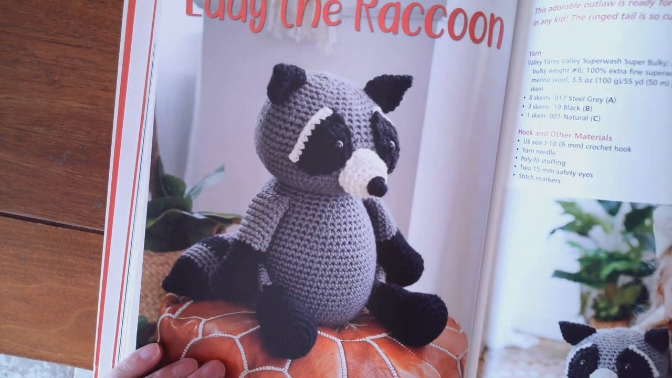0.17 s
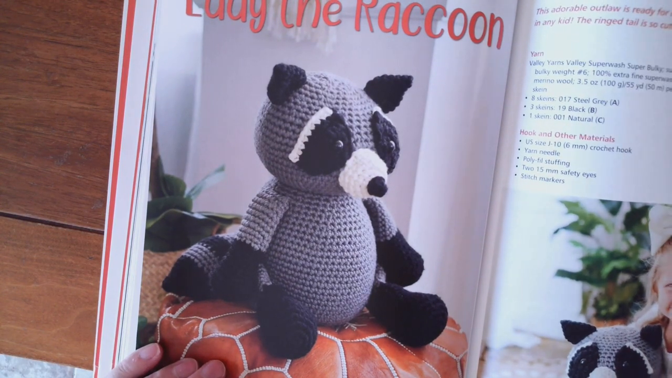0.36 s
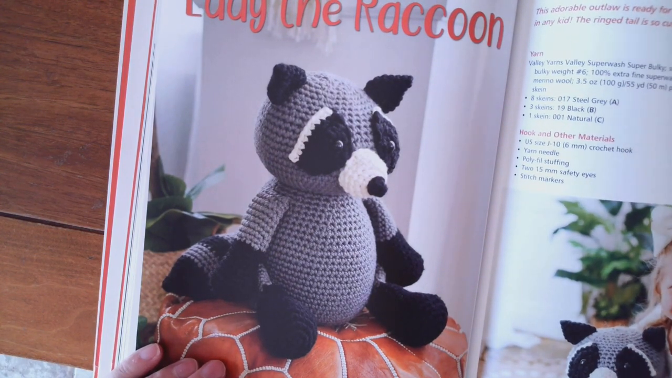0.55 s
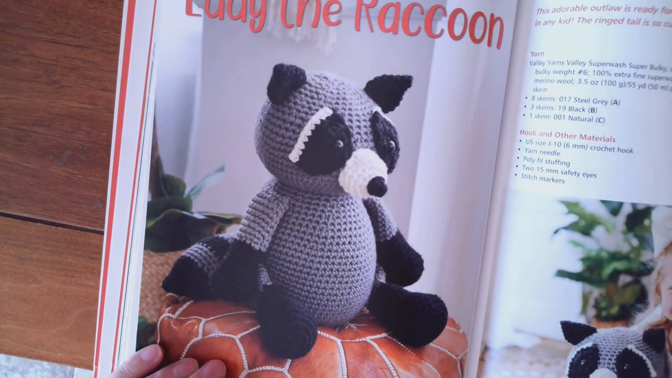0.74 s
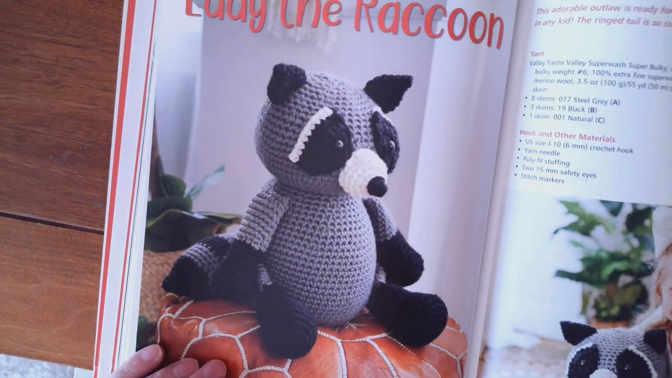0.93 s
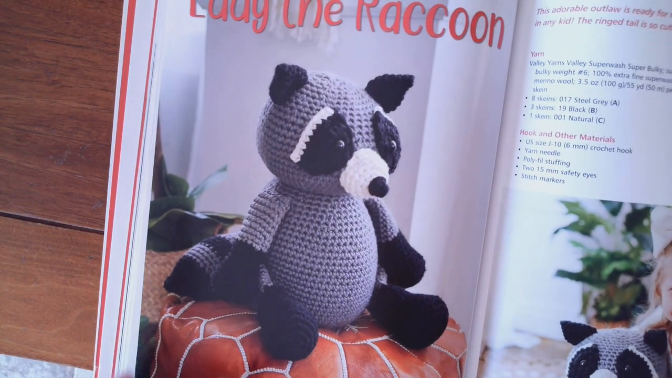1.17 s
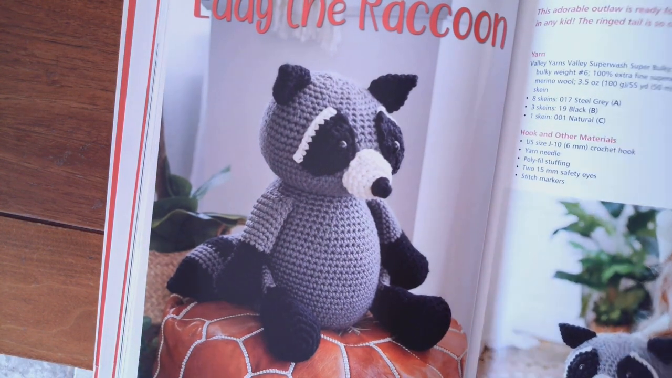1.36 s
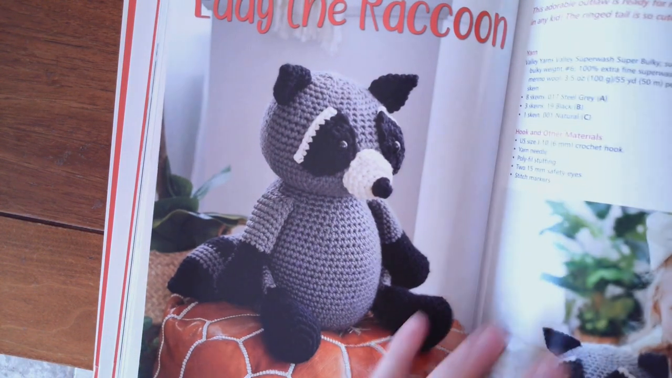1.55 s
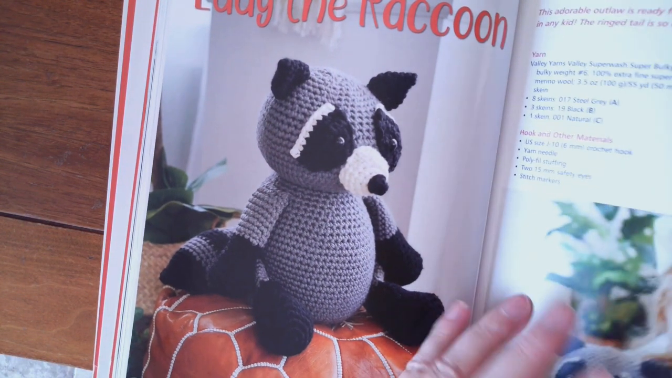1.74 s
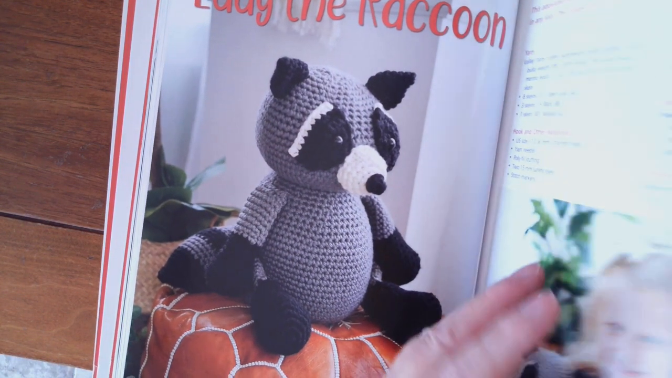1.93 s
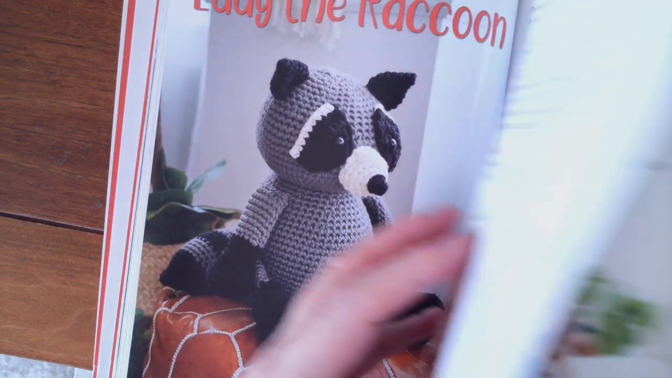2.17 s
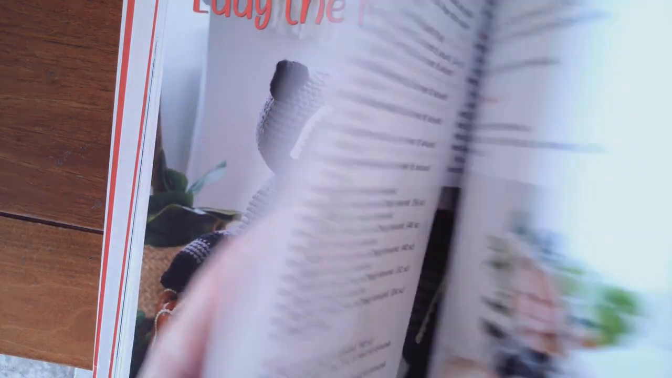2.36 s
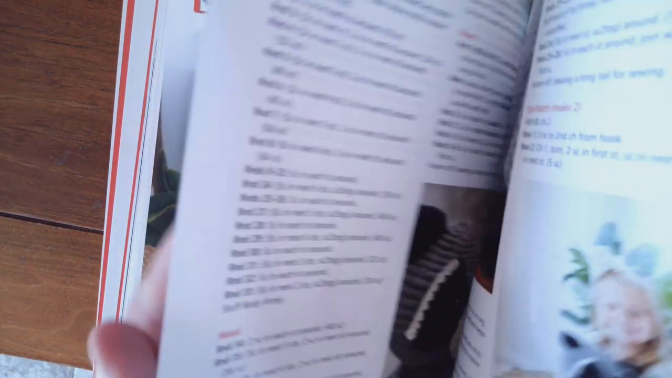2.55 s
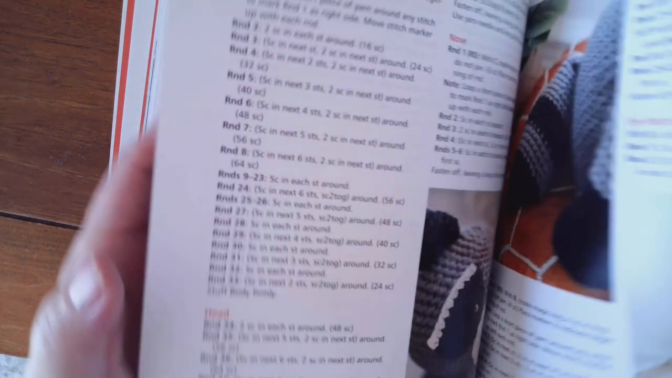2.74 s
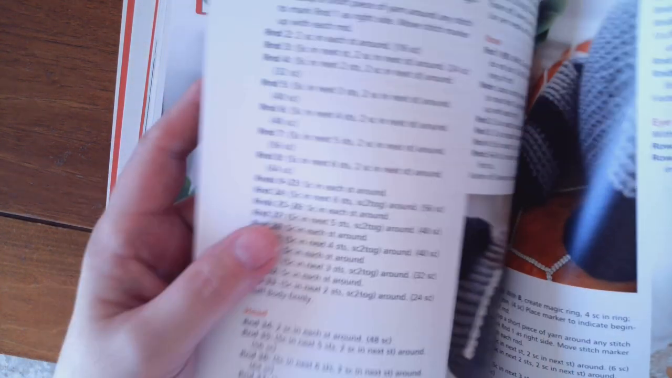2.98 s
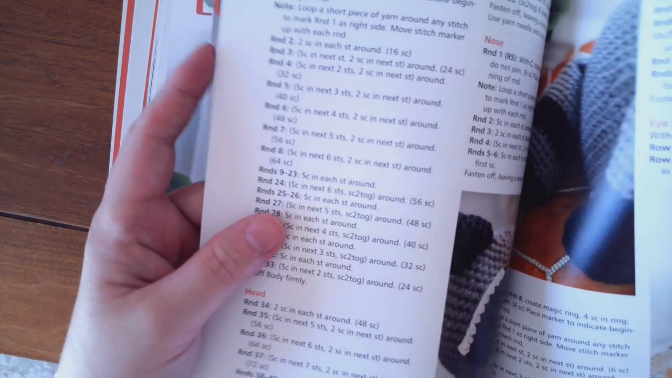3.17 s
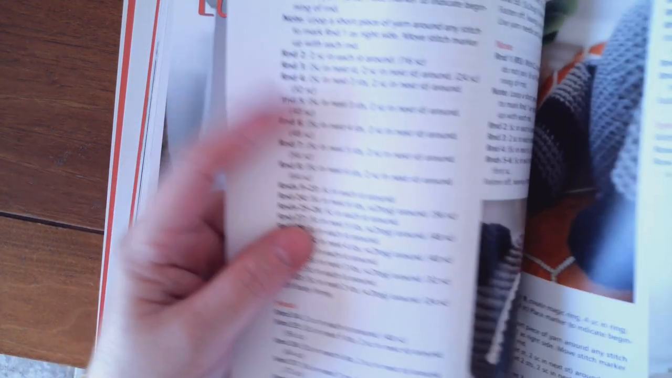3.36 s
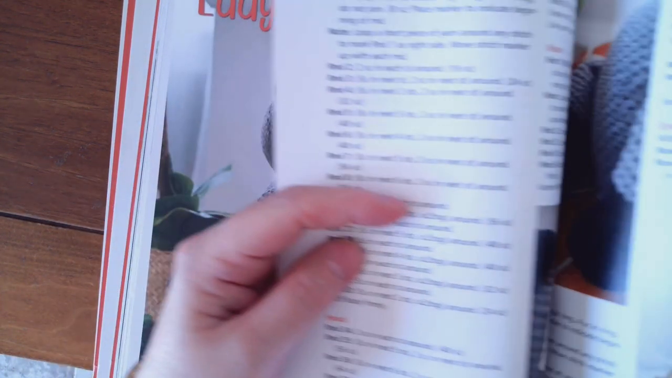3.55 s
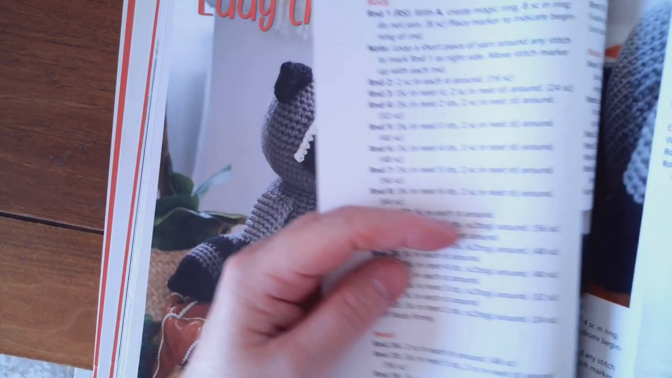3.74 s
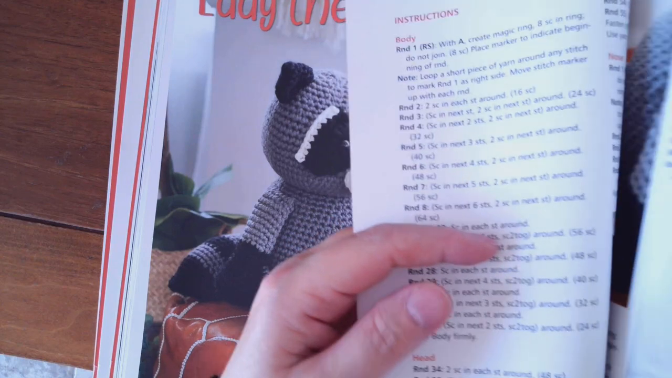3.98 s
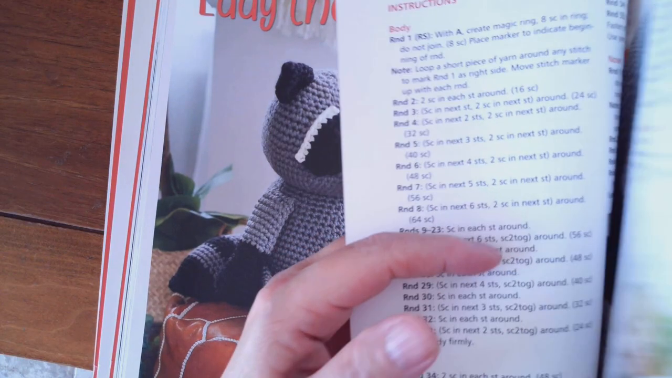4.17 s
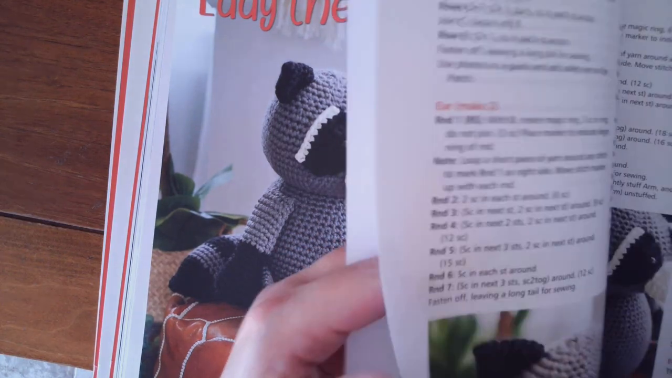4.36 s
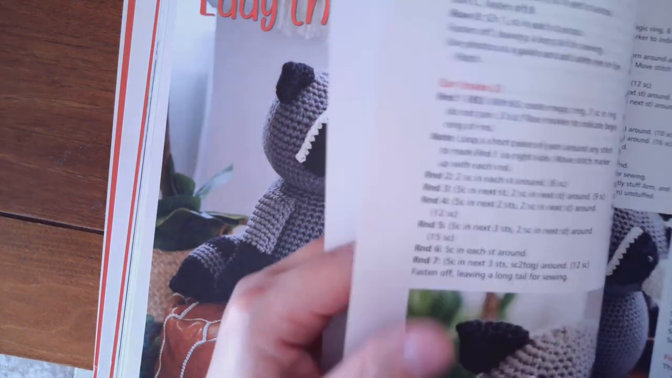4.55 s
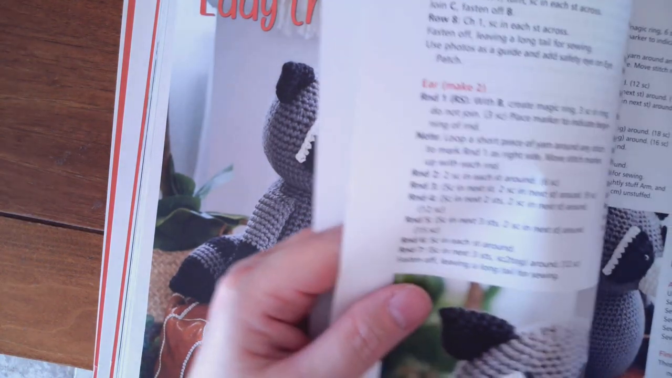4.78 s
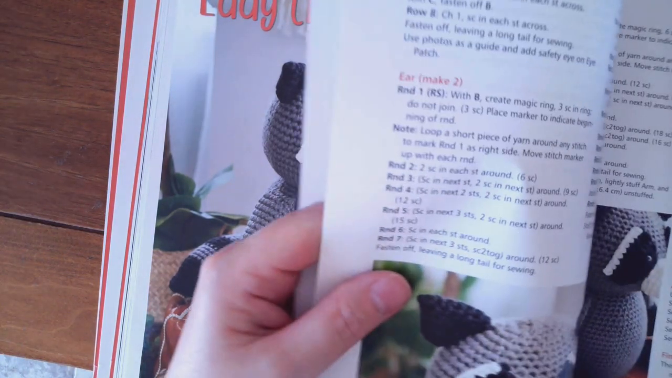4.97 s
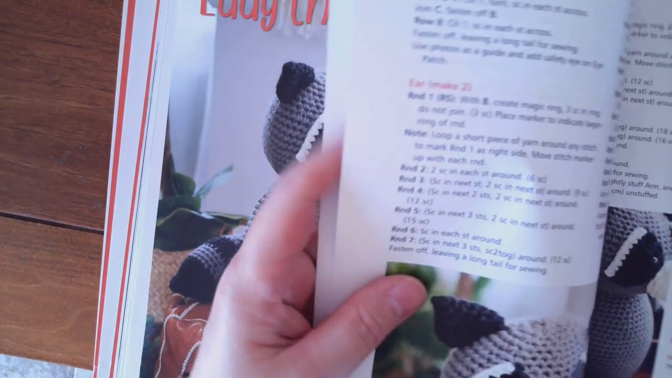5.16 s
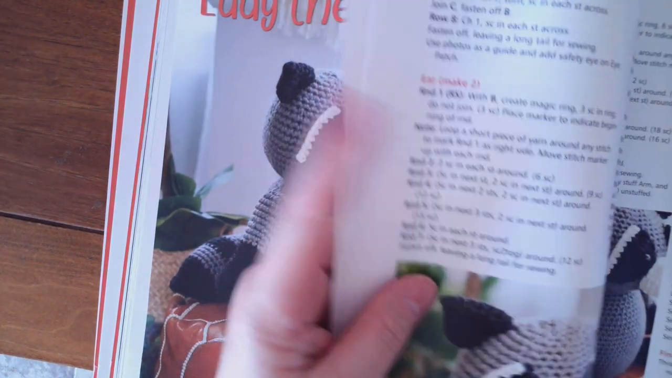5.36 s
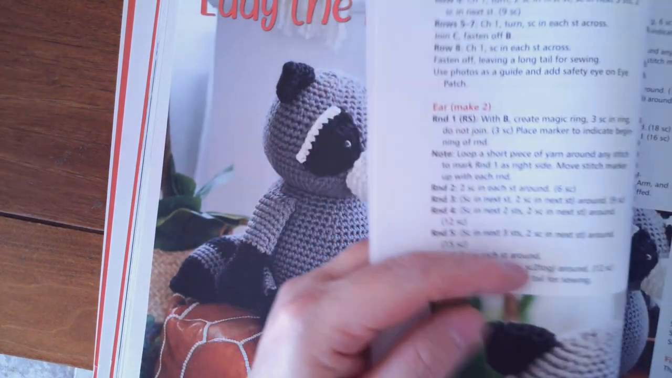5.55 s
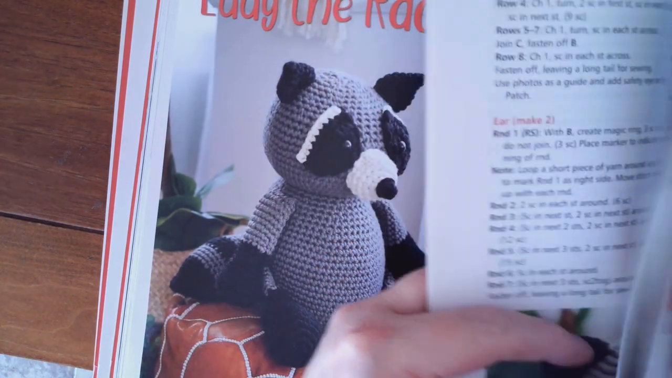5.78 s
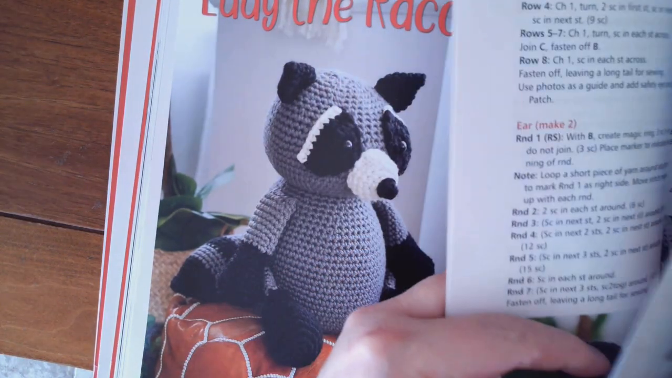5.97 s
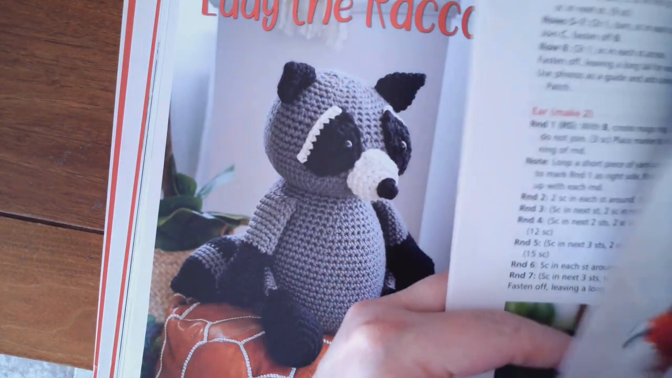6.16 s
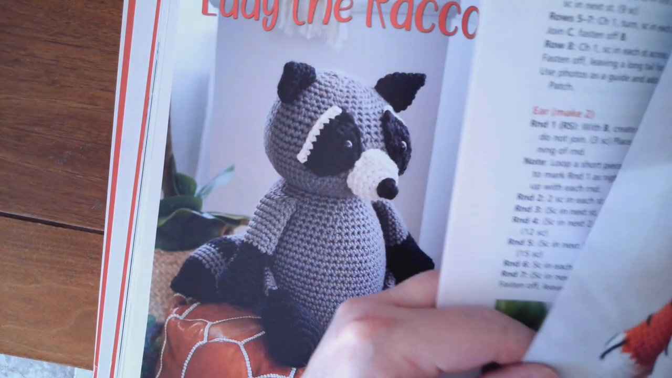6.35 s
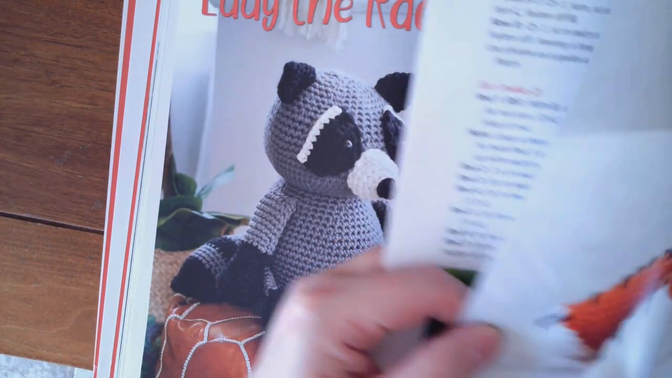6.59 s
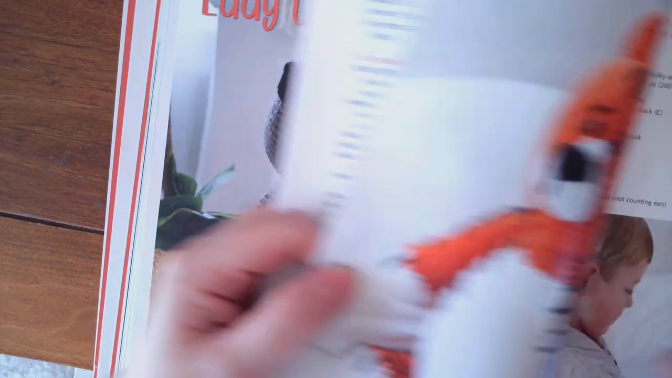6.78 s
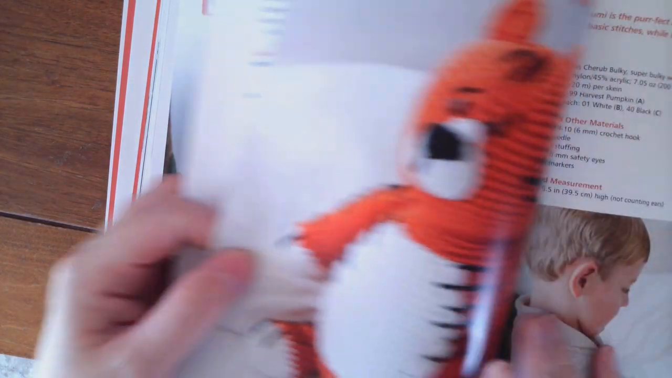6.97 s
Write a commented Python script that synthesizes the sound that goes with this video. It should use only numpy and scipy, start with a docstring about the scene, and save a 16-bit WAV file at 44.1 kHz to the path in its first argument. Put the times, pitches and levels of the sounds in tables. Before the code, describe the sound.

Close, dry paper handling in a quiet indoor room. Light finger brushing gives way to a clear page flick, then swishing, bending sheets with soft thuds and small clicks. Midway a hard, bright snap stands out, with a cluster of crackles just after. Later the pages rub and hiss in quick, uneven strokes. Low air noise with a faint hum stays underneath; the tail is short.

```python
"""A quiet room with a wooden table: a hand leafs through a glossy book, close to a small stereo microphone.
Sliding paper is flickering coloured noise with tiny clicks and hollow rings from air between the sheets.
Buckling sheets snap: a pulse and a short scrape excite resonances. Short puffs of band-limited noise
come from landing sheets or sound along with a snap. The room answers with a few reflections and a short tail.
Underneath lies faint ventilation: filtered noise with a hum of wavering sines."""
import sys
import numpy as np
from scipy import signal
from scipy.io import wavfile
from scipy.ndimage import map_coordinates

SR = 44100
rng = np.random.default_rng(int(sys.argv[2]) if len(sys.argv) > 2 else 0)


def inscribe(sig):
    """Save sig as 16-bit PCM at rate SR to the path in sys.argv[1].

    A 1-D sig is mono; a 2-D sig holds one channel per row.
    Samples are clipped to [-1, 1] before scaling.
    """
    pcm = np.round(np.clip(np.atleast_2d(sig).T, -1, 1) * 32767)
    wavfile.write(sys.argv[1], SR, pcm.astype(np.int16))


N = 309582
TIME = np.arange(N) / SR
DRIFT_STEP = 40  # samples between the values of a slow curve


def from_db(db):
    """Decibels to gain."""
    return 10 ** (np.asarray(db) / 20)


def rms_one(x):
    """Scale to rms 1."""
    return x / np.sqrt(np.mean(x ** 2) + 1e-20)


def in_time(rows):
    """Read a curve of (seconds, value) at every sample."""
    return np.interp(TIME, *np.transpose(rows))


def at_hz(points, hz):
    """Read a spectrum on a log-frequency axis."""
    f, value = np.transpose(points)
    return np.interp(np.log(hz), np.log(f), value)


def delayed(x, s):
    """The same sound s seconds later; s may change with time."""
    return map_coordinates(x, [(TIME - s) * SR], order=3)


def drift(rate_hz):
    """Slow random wandering with rms 1: white noise through two equal low-pass poles."""
    r = np.exp(-2 * np.pi * DRIFT_STEP * rate_hz / SR)
    white = rng.standard_normal(N // DRIFT_STEP + 2002)
    slow = signal.lfilter([1], [1, -2 * r, r * r], white)[2000:]  # drop the filter's start
    return np.interp(np.arange(N) / DRIFT_STEP, np.arange(len(slow)), rms_one(slow))


def band(x, low_hz, high_hz, order=2):
    """Butterworth band-pass."""
    edges_hz = [low_hz, min(high_hz, .45 * SR)]
    return signal.sosfilt(signal.butter(order, edges_hz, "band", fs=SR, output="sos"), x)


def resonator(hz, width_hz):
    """Coefficients of a two-pole resonance with gain about 1 at its peak."""
    r = np.exp(-np.pi * width_hz / SR)
    return (1 - r * r) / 2 * np.array([1, 0, -1]), [1, -2 * r * np.cos(2 * np.pi * hz / SR), r * r]


# How alike left and right hear sound from all around. Each row: frequency in Hz, correlation from 0 to 1.
LEFT_RIGHT_LIKENESS = [(30, 0.2), (130, 0), (260, 0), (500, 0.9), (1200, 0.83), (2400, 0.64), (5000, 0),
                       (10000, 0)]


def noise_bands(size, table):
    """Half-octave bands of stereo noise over a table's range, most alike in the middle: (Hz, noise)."""
    edges_hz = 22 * 2 ** np.arange(0, 9.1, .5)
    white = rng.standard_normal((2, 2, size))
    for k, (low, high) in enumerate(zip(edges_hz, edges_hz[1:])):
        if high < table[0][0] or low > table[-1][0]:
            continue
        mid, side = band(white[k % 2], low, high)  # neighbouring bands use different noise
        hz = np.sqrt(low * high)
        alike = np.clip(at_hz(LEFT_RIGHT_LIKENESS, hz), 0, 1)
        yield hz, np.sqrt(1 + alike) * mid + np.sqrt(1 - alike) * np.array([side, -side])


def coloured(spectrum, patchy_db):
    """Stereo noise with a given colour whose bands flicker separately; rms 1."""
    total = 0
    for hz, noise in noise_bands(N, spectrum):
        total = total + noise * from_db(at_hz(spectrum, hz) + patchy_db * drift(14.7))
    return rms_one(total)


def sliding(grip_db=1.24):
    """Paper slides with an uneven grip that shakes all parts of the friction together."""
    rub_gain, hiss_gain = stroke_levels()
    grip = from_db(grip_db * drift(47))
    friction = off_facing_page(rub_gain * rubbing_face() + hiss_gain * hissing_edge())
    return grip * (friction + rub_gain * air_pockets() + bending_swish(rub_gain))


# The hand pushes a sheet along, which then runs out. Each row: start in seconds, push in seconds,
# run-out in seconds to -20 dB, rub of the face in dB, hiss of the edge in dB (both before crinkles and grip).
STROKES = [(0.286, 0.057, 0.3, -67, -70), (0.608, 0.1, 0.07, -63, -60), (0.797, 0.041, 0.05, -61.0, -60.0),
           (0.879, 0.105, 0, -59.5, -59), (1.041, 0.038, 0.07, -65.5, -61),
           (1.156, 0.018, 0.43, -71.5, -66), (1.332, 0.159, 0.08, -57.5, -59.5),
           (1.479, 0.09, 0.11, -55.0, -60.5), (1.62, 0.102, 0.44, -70, -65),
           (2.189, 0.129, 0.3, -73.5, -64), (2.33, 0.013, 0.03, -57.5, -55.5),
           (2.425, 0.092, 0.07, -60.0, -54.5), (2.489, 0.12, 0.13, -48.5, -51),
           (2.724, 0.046, 0.38, -58, -62), (2.921, 0.059, 0.08, -50.5, -53.0),
           (2.983, 0.099, 0.36, -51.5, -53), (3.141, 0.035, 0.17, -57, -62.0),
           (3.241, 0.084, 0.47, -53.5, -57.5), (3.503, 0.069, 0.1, -49.0, -48),
           (3.584, 0.029, 0.09, -45.0, -44.5), (3.675, 0.089, 0.13, -59.5, -57),
           (3.769, 0.044, 0.11, -55, -52.0), (3.872, 0.042, 0.27, -57, -57.0),
           (3.952, 0.05, 0.02, -58, -59), (4.153, 0.052, 0.13, -66.5, -56.5),
           (4.21, 0.054, 0.1, -62.5, -56.5), (4.298, 0.014, 0.29, -45, -46.0),
           (4.444, 0.027, 0.04, -48.0, -45), (4.728, 0.014, 0.17, -64.0, -67.0),
           (4.807, 0.11, 0.2, -72.5, -61.0), (4.905, 0.023, 0.04, -58.5, -52.5),
           (4.938, 0.11, 0.23, -54.5, -54.5), (5.164, 0.064, 0.24, -55.5, -57.5),
           (5.36, 0.095, 0.06, -55.5, -54.5), (5.558, 0.077, 0.15, -53.5, -50.5),
           (5.746, 0.056, 0.28, -55.5, -55.5), (5.883, 0.027, 0.06, -58.5, -51.0),
           (6.016, 0.011, 0.02, -56, -53.5), (6.073, 0.102, 0.08, -54.0, -47),
           (6.185, 0.032, 0.2, -53.0, -58.5), (6.326, 0.035, 0.09, -46.5, -47.5),
           (6.38, 0.103, 0.09, -52.5, -44.0), (6.521, 0.016, 0.11, -47.5, -52.0),
           (6.789, 0.019, 0.5, -58.5, -65)]
SPEED_UP_SHARE = 0.87  # part of a push spent gathering speed
# Between strokes the fingers keep shifting on the paper.
FIDGET_RUB_DB, FIDGET_HISS_DB, FIDGET_SWING_DB, FIDGET_RATE_HZ = -74, -78.5, 1.5, 4


def stroke_levels():
    """Each stroke gathers speed and runs out; powers add to the fidgeting: gains of rub and hiss."""
    t = TIME[::40]
    s, push_s, run_out_s, rub_db, hiss_db = np.transpose(STROKES)[:, :, None]
    attack = np.sin(np.pi / 2 * np.clip((t - s) / (SPEED_UP_SHARE * push_s), 0, 1))
    release = from_db(-20 * np.clip((t - s - push_s) / run_out_s, 0, 10))
    motion = attack * release
    rub = np.interp(TIME, t, np.linalg.norm(from_db(rub_db) * motion, axis=0))
    hiss = np.interp(TIME, t, np.linalg.norm(from_db(hiss_db) * motion, axis=0))
    fidget = from_db(FIDGET_SWING_DB * drift(FIDGET_RATE_HZ))
    return np.hypot(rub, from_db(FIDGET_RUB_DB) * fidget), np.hypot(hiss, from_db(FIDGET_HISS_DB) * fidget)


# Colour of the rubbing face. Each row: frequency in Hz, relative density in dB per Hz.
RUB_COLOUR = [(500, -17), (900, -2), (1400, -3.5), (2000, 2.5), (2900, -3.5), (4200, -6.5), (6000, -19.5),
              (10000, -16.5)]


def rubbing_face(crinkle_db=-6.5):
    """The face of the sheet rubs as mid-range noise with small crinkles."""
    crinkle = crinkles(per_s=260, low_hz=1200, high_hz=3830)
    return coloured(RUB_COLOUR, patchy_db=1.1) + from_db(crinkle_db) * crinkle


# Colour of the hissing edge. Each row: frequency in Hz, relative density in dB per Hz.
HISS_COLOUR = [(1500, -30), (3000, 9.5), (4500, 3.5), (6000, 10), (8000, -3.5), (9500, -4.5), (11000, -13)]


def hissing_edge():
    """The edge of the sheet hisses as brighter, patchier noise with denser crinkles."""
    return coloured(HISS_COLOUR, patchy_db=4.5) + 0.48 * crinkles(per_s=450, low_hz=4200, high_hz=9500)


def crinkles(per_s, low_hz, high_hz):
    """Fibres catch and let go: tiny clicks of uneven size; rms 1."""
    size_db = 4 * np.minimum(rng.exponential(1, N), 2.5)
    sizes = from_db(size_db) * rng.choice([-1, 1], N)
    clicks = sizes * (rng.random(N) < per_s / SR) + 1e-18
    return rms_one(band(clicks, low_hz, high_hz))


def off_facing_page(x):
    """The facing page mirrors the friction; as the sheet moves, the comb of this echo wanders."""
    lag_s = .0009 * from_db(3.5 * drift(2.5))
    return x + .33 * np.array([delayed(side, lag_s) for side in x])


# A wedge of air between two sheets rings as it closes. Each row: loudest moment in seconds,
# half length in seconds, pitch at that moment in Hz, level in dB relative to the rub.
AIR_POCKETS = [(1.52, .1, 2000, -8), (2.578, .08, 1714, 1.5), (2.76, 0.15, 1300, 1), (3.58, 0.09, 1960, -7),
               (5.436, 0.065, 1780, 0), (6.03, .04, 1410, 0.5), (6.203, .15, 1430, -5.5)]
POCKET_SAG_OCTAVES_PER_S = 0.46


def air_pockets():
    """The nearest air wedge swells and fades while its note sinks; level relative to the rub."""
    rows = np.array(AIR_POCKETS)
    nearest = np.abs(TIME - rows[:, :1]).argmin(axis=0)
    s, half_s, hz, db = rows[nearest].T
    gap_hz = hz * 2 ** (-POCKET_SAG_OCTAVES_PER_S * (TIME - s))
    gain = from_db(db) * np.exp(-((TIME - s) / half_s) ** 2)
    return gain * air_gap(gap_hz, width_hz=126)


def air_gap(hz, width_hz):
    """Friction noise rings in the wedge of air, a resonance whose pitch moves; rms 1."""
    out, state = rng.standard_normal(N), np.zeros(2)
    for i in range(0, N, 256):
        b, a = resonator(hz[i], width_hz)
        out[i:i + 256], state = signal.lfilter(b, a, out[i:i + 256], zi=state)
    return rms_one(band(out, 800, 2600))


# Colour of the swish. Each row: frequency in Hz, relative density in dB per Hz.
SWISH_COLOUR = [(40, -6), (120, 1), (250, 1.5), (450, 3), (800, -1), (1100, 7), (1700, -34), (3000, -17)]
# The bending sheet, loudest while the bundle is held upright. Each row: time in seconds, level in dB before grip.
BEND_LEVEL = [(0, -69), (2.1, -65), (2.7, -62.5), (3.25, -57.5), (3.7, -62.5), (4.7, -65.5), (5.1, -60.5),
              (5.7, -67.5), (7.0, -64.5)]
SWISH_RE_RUB_DB = -14.5


def bending_swish(rub_gain):
    """The whole sheet swishes as it bends, and also follows the rub."""
    gain = np.hypot(from_db(in_time(BEND_LEVEL)), from_db(SWISH_RE_RUB_DB) * rub_gain)
    return gain * coloured(SWISH_COLOUR, patchy_db=1.5)


# A sheet buckles or lands. Each row: start in seconds, level of the ring in dB over 5 ms, ring in Hz,
# crack in dB relative to the ring, thud in dB relative to the ring, scrape share from 0 to 1.
SNAPS = [(0.022, -53.5, 1500, -9.5, -6, 0.5), (0.4684, -58, 2070, -4.5, -11, .9),
         (0.546, -56, 2490, -3, -18, 0.6), (0.8036, -41, 3540, -2.5, -13.5, 0.04),
         (1.181, -54.5, 2580, -7, -13, .3), (1.0503, -51, 1680, -9, -13, 0),
         (1.0715, -52, 1550, -10, -5, .1), (1.081, -52.5, 1510, -6, -12, 0.2),
         (1.2221, -44.5, 3220, -2.5, -13, 0), (1.5011, -54, 1650, 2.5, -2, .3),
         (2.0095, -28.5, 1590, -24, -16, 1), (2.0112, -32, 2120, -21, -24, 0),
         (2.148, -53.5, 1100, -20, -2, 0.3), (2.3799, -50.5, 2240, -16, -24, .4),
         (2.7118, -50.5, 1010, -9, -7, .2), (2.7478, -40.5, 2550, -6.5, -1.5, 0),
         (2.7759, -35, 1140, -31, -11, .12), (2.8493, -46, 1380, -25, -9, 0.2),
         (3.117, -45, 1200, -16, -13, .3), (3.1344, -40, 1160, -26, -10, .04),
         (3.309, -45, 1900, -12, -3, 0.05), (3.342, -48.5, 1600, -7, 3, .15),
         (3.3675, -33, 2130, -24, -25, 1), (3.3695, -35.5, 2300, -23, -36, 1),
         (3.6113, -37.5, 1100, -3, -1.5, 0), (3.629, -40, 2690, -2.5, -19, .2),
         (3.7235, -49.5, 950, -16, -15, 0.03), (4.0228, -40, 1180, -33, -6, .3),
         (4.1894, -48, 2680, -15, -13, 1), (4.3068, -20.5, 2920, -8.5, -18.5, 0.3),
         (4.31064, -15.8, 2720, -8, -32, .05), (4.478, -33.5, 2280, -6, -9, .6),
         (4.4837, -28, 2110, -3, -11.5, 0.36), (4.4863, -24, 1870, -25, -18.5, 0.98),
         (4.491, -34, 1790, -26, -11.5, 0.6), (4.497, -31.5, 1700, -33, -18, 0.96),
         (4.9655, -33.5, 2980, -3.5, -44, .74), (4.9672, -33, 2900, -5.5, -27, .5),
         (5.111, -45.5, 1100, -14, -29, 0.35), (5.2824, -37, 1830, -19, -14, 0.36),
         (5.6342, -47, 1790, 0, -4, 0.5), (6.0105, -51.5, 2940, 1.5, -30, .7),
         (6.1211, -44, 3470, 6.5, -27, 0.92), (6.136, -41, 2530, 0, -24, 0.7),
         (6.2119, -48.5, 1700, -10, -28, .1), (6.344, -45.5, 3300, -1, -14, .7),
         (6.356, -39.5, 2620, .5, -34, 1), (6.363, -40.5, 3130, 2, -9, .05),
         (6.5544, -36.5, 3200, -7, -30, .7), (6.5962, -40.5, 1600, -30, -14, 0.13)]


def snaps(scrape_s=0.0016, width_hz=750, broad_db=-11, crack_hz=4200, thud_low_hz=130, thud_high_hz=700):
    """The paper pops in one pulse and its edge scrapes briefly: a ring, a bright crack, a thud of air."""
    out, t = np.zeros(N + SR), TIME[:SR // 25]
    pop = 1. * (t == 0)
    for s, db, hz, crack_db, thud_db, share in SNAPS:
        share = np.clip(share, 0, 1)
        scrape = rms_one(rng.standard_normal(len(t)) * np.sqrt(t) * np.exp(-t / scrape_s))
        push = sheet(np.sqrt(1 - share) * rms_one(pop) + np.sqrt(share) * scrape)
        ring = signal.lfilter(*resonator(hz, width_hz), push)
        ring = ring + from_db(broad_db) * band(push, hz / 2, 2 * hz)
        crack = band(push + .5 * scrape, crack_hz, 8340)
        thud = band(pop, thud_low_hz, thud_high_hz)
        snap = rms_one(band(ring, 440, 4200))
        snap = snap + from_db(crack_db) * rms_one(crack) + from_db(thud_db) * rms_one(thud)
        at = round(s * SR)
        # rms over the whole 40 ms becomes level over 5 ms; the pulse points downward
        out[at:at + len(t)] -= from_db(db) * np.sqrt(.005 / t[-1]) * snap
    return out[:N]


# Modes of a stiff sheet. Each row: frequency in Hz, width in Hz, level in dB relative to the direct push.
SHEET_MODES = [(700, 19, -22), (850, 130, 6), (1260, 120, -10), (1980, 190, -6.5), (2300, 56, -37),
               (2830, 124, -8), (3170, 140, -10.5), (3500, 160, -10), (4170, 330, -9), (5600, 430, -2)]


def sheet(x):
    """A push on the paper is heard directly and through the modes of the sheet."""
    modes = sum(from_db(db) * signal.lfilter(*resonator(hz, width), x) for hz, width, db in SHEET_MODES)
    return bending_waves(x + modes)


def bending_waves(x, hz=3000, width_hz=2600):
    """Bending waves travel at a speed that depends on pitch; three all-passes smear a pop into a chirp."""
    _, a = resonator(hz, width_hz)
    return signal.sosfilt([[*a[::-1], *a]] * 3, x)


# Short puffs of noise, some from a landing sheet, some sounding along with a snap.
# Each row: start in seconds, level in dB before decay and flutter, lowest frequency in Hz,
# highest frequency in Hz, decay to -60 dB in seconds.
PUFFS = [(1.05, -53.5, 1400, 1950, .15), (1.735, -53.5, 400, 1200, .16), (2.010, -43.5, 600, 1150, .12),
         (2.748, -43, 55, 503, 0.21), (3.31, -50, 66, 219, 0.24), (3.342, -46.5, 65, 250, .25),
         (3.611, -41.5, 70, 800, .08), (4.022, -50.5, 350, 1290, .2), (4.311, -36, 500, 2450, .16),
         (4.477, -45, 45, 98, .18), (4.484, -38.5, 420, 3300, 0.31), (4.525, -32.5, 1300, 2580, 0.039),
         (6.212, -45.5, 1240, 1880, 0.078), (6.596, -39.5, 1310, 2080, 0.058), (6.789, -49, 350, 2590, .16),
         (6.807, -44.5, 160, 880, .22)]


def puffs(rise_s=0.00061, flutter_db=3):
    """Each puff is band-limited noise that starts at once and flutters as it dies away."""
    out, t = np.zeros(N + SR), TIME[:SR // 3]
    for s, db, low_hz, high_hz, t60 in PUFFS:
        noise = rng.standard_normal(2 * len(t))
        puff = rms_one(band(noise, low_hz, high_hz))[len(t):]  # second half: the filter has settled
        at = round(s * SR)
        out[at:at + len(t)] += from_db(db - 60 * t / t60) * (1 - np.exp(-t / rise_s)) * puff
    return out[:N] * rms_one(from_db(flutter_db * drift(150)))


# Decay of the room. Each row: frequency in Hz, decay to -60 dB in seconds.
ROOM_T60 = [(100, 0.8), (500, 0.6), (2000, 0.47), (4000, 0.31), (9000, 0.34)]
# First reflections. Each row: delay in seconds, level in dB relative to the direct sound.
REFLECTIONS = [(.0043, -29), (.0071, -23), (0.0206, -20), (0.033, -36)]


def room(x, tail_db, build_s=0.005, dull_hz=7000):
    """A few reflections from table and walls, then a diffuse tail that dies sooner in the treble."""
    t = TIME[:SR // 2]
    tail = 0
    for hz, noise in noise_bands(len(t), ROOM_T60):
        tail = tail + noise * from_db(-60 * t / at_hz(ROOM_T60, hz)) / np.hypot(1, hz / dull_hz)
    tail = rms_one(tail * (1 - np.exp(-t / build_s)))
    response = from_db(tail_db) * tail / np.sqrt(len(t))  # tail energy set relative to the direct sound
    for s, db in REFLECTIONS:
        response[:, round(s * SR)] += from_db(db)
    return signal.fftconvolve(x.mean(axis=0)[None], response, axes=1)[:, :N]


# Colour of the ventilation. Each row: frequency in Hz, relative density in dB per Hz.
AIR_COLOUR = [(20, 5), (40, 2.5), (70, -2), (130, -4.5), (220, -10.5), (340, -18.5), (500, -20), (700, -28),
              (1500, -21.5), (2200, -23), (3100, -22.5), (4500, -19.5)]
# Hum of the ventilation. Each row: frequency in Hz, rms level in dB.
HUM = [(120, -69), (151, -77.5), (473, -71.5), (531, -77.5), (591, -86)]
AIR_DB, AIR_EDGE_HZ = -54.5, 3300  # level before the edge filter and the panning; upper edge
AIR_TOP_DB, RUMBLE_PAN_DB = -71, 2  # faint hiss; rumble up on the right, down on the left


def ventilation(waver=0.42, rumble_hz=220):
    """Air noise with a steep upper edge, its rumble stronger on the right; faint hiss; a wavering hum."""
    air = from_db(AIR_DB) * coloured(AIR_COLOUR, patchy_db=1.4)
    air = signal.sosfilt(signal.butter(12, AIR_EDGE_HZ, fs=SR, output="sos"), air)
    rumble = signal.sosfiltfilt(signal.butter(2, rumble_hz, fs=SR, output="sos"), air)
    air = air + rumble * (from_db([[-RUMBLE_PAN_DB], [RUMBLE_PAN_DB]]) - 1)
    hiss = from_db(AIR_TOP_DB) * rms_one(band(rng.standard_normal((2, N)), 2500, 9000, order=1))
    hum = 0
    for hz, db in HUM:
        phase = 2 * np.pi * hz * TIME + waver * drift(3)  # waver in radians
        hum = hum + from_db(db) * np.sqrt(2) * np.sin(phase)
    return air + hiss + hum


# Where the hand works, heard as a later arrival at the microphone's left port.
# Each row: time in seconds, lag in seconds.
LEFT_PORT_LAG = [(1.7, 4e-6), (2.0, 4.7e-5), (2.6, 5e-5), (3.0, 3e-5), (3.9, 2.2e-5), (4.3, 4.2e-5),
                 (5.0, 5e-5), (6.3, 2.9e-5)]


def scene():
    """The hand works a little to the right, so its sound reaches the left port later."""
    friction = sliding()
    pops = np.array([snaps() + puffs()] * 2)
    left, right = pops + friction
    direct = np.array([delayed(left, in_time(LEFT_PORT_LAG)), right])
    return direct + room(pops, tail_db=-16.0) + room(friction, tail_db=-12.5) + ventilation()


CUTOFF_HZ = 10200


def record(dry):
    """The highest peaks are rounded and the top is cut steeply."""
    rounded = .7 * np.tanh(dry / .7)
    return signal.sosfilt(signal.ellip(10, .3, 70, CUTOFF_HZ, fs=SR, output="sos"), rounded)


dry = scene()
out = record(dry)
inscribe(out)
```